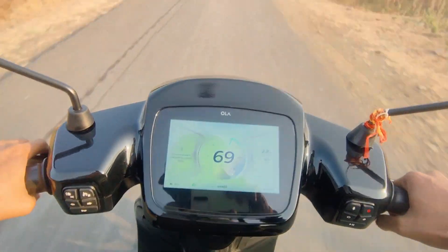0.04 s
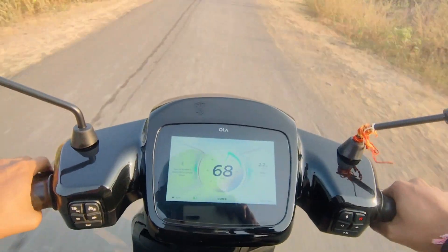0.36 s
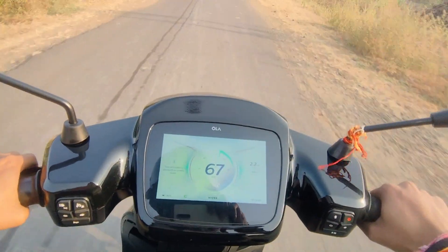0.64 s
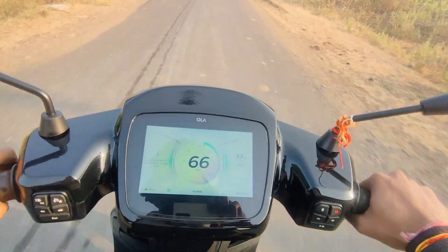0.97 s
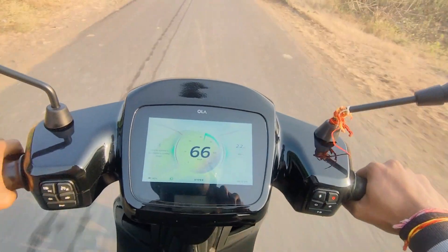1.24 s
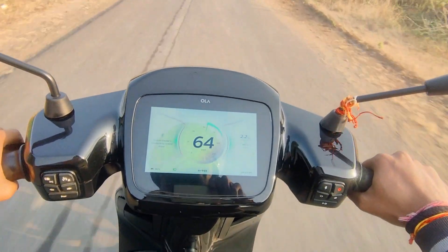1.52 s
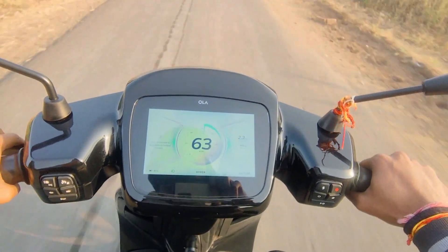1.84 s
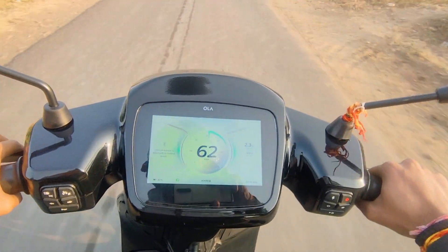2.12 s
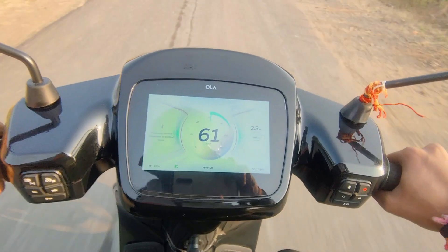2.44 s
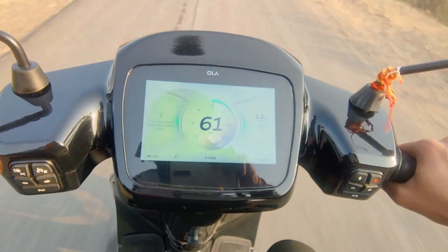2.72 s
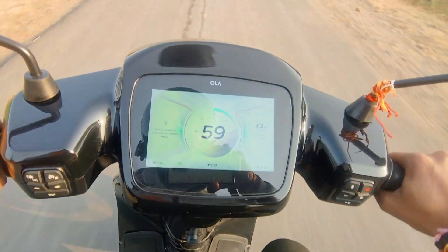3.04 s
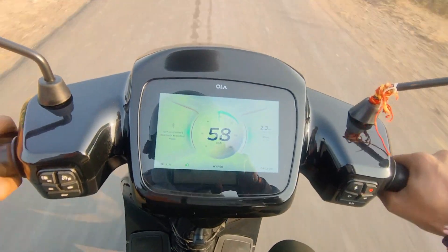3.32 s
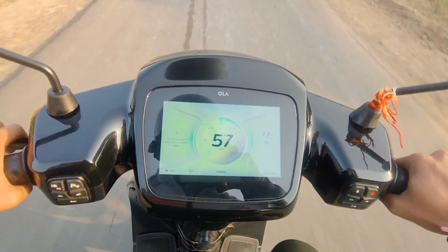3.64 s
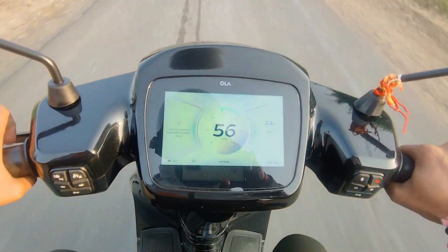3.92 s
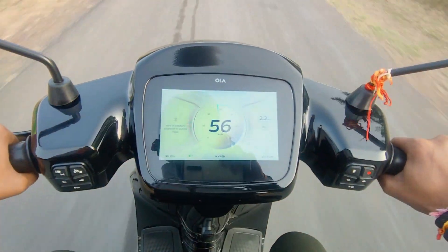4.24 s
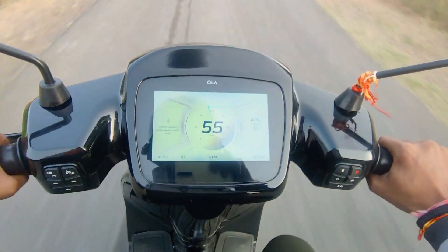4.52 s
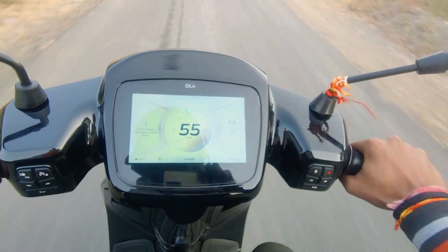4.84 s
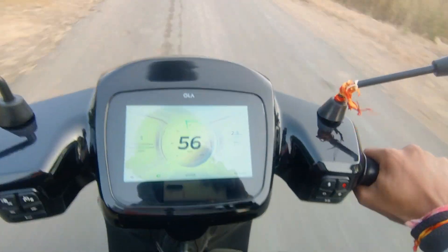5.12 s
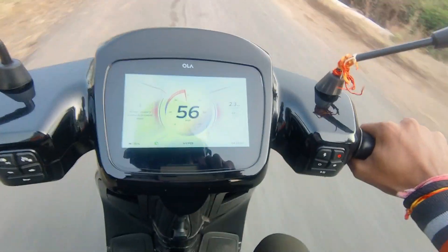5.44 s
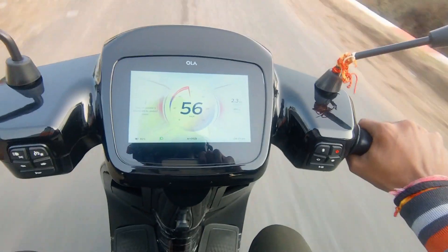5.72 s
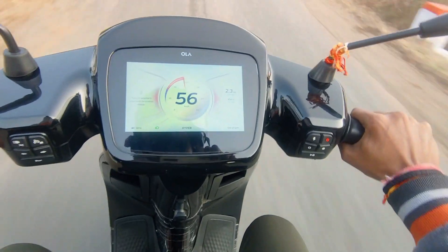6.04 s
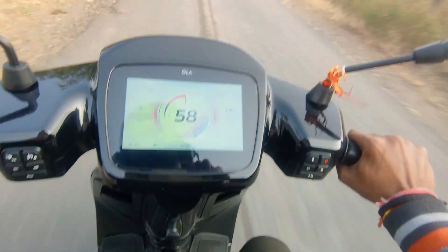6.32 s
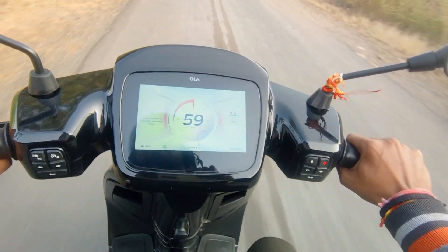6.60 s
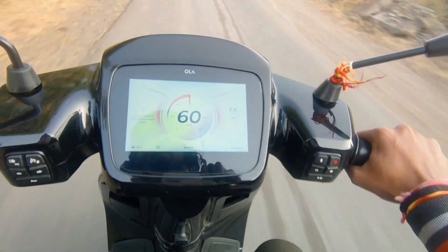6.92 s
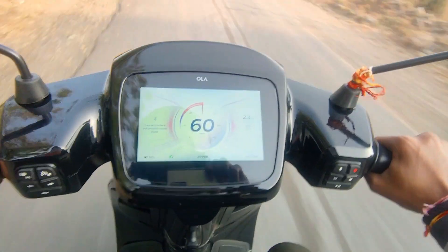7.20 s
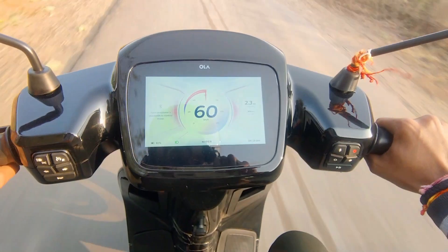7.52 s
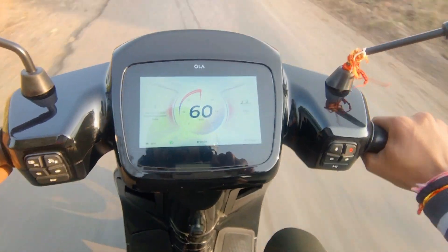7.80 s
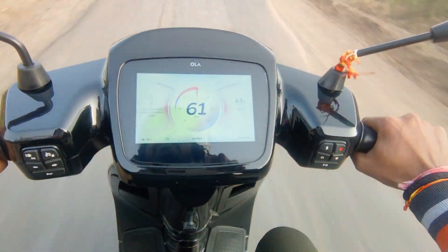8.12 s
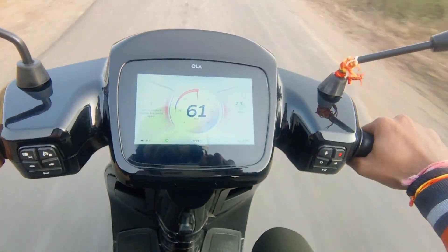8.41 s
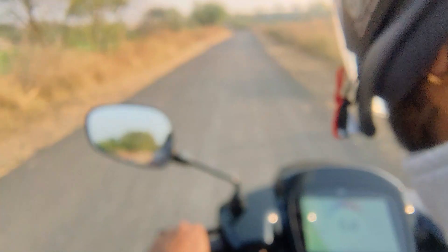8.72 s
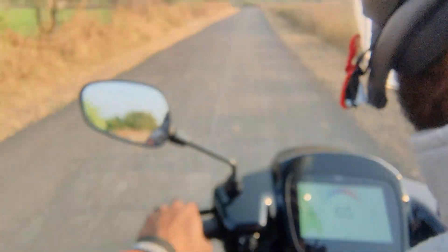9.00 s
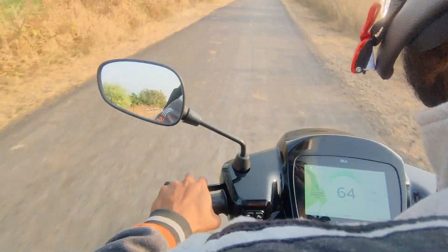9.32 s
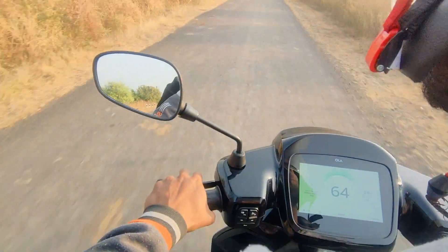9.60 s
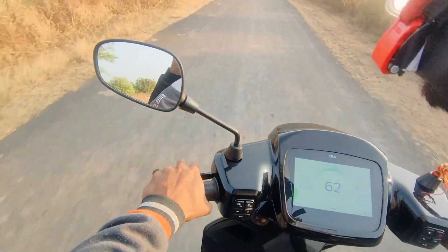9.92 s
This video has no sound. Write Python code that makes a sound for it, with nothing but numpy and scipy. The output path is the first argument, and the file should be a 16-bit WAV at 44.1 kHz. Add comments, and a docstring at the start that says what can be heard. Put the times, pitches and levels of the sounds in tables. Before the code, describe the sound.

Gusty wind rumbles over an electric scooter's tyres and motor, cuts out briefly, then returns with a loud, high, many-toned whine.

```python
"""Wind on a scooter ride

An electric scooter rides fast along a country road. Turbulent eddies buffet and spit at each of two
microphone ports independently, and the rumble grows as the airstream leans to the left. Beneath it
the tyres hiss, grit ticks and a motor-like whirr, the harmonics of a shaft, revs up and sinks twice.
After a click and half a second of silence the wind is back, with a loud, many-toned whine on the left."""
import sys
import numpy as np
from scipy import signal
from scipy.fft import rfft, irfft, next_fast_len
from scipy.io import wavfile
from scipy.ndimage import map_coordinates

SR = 44100
rng = np.random.default_rng(int(sys.argv[2]) if len(sys.argv) > 2 else 0)


def digitize_waveform(pressure):
    """Quantize a signal to 16-bit integers and store it at the path in sys.argv[1].

    Rows of a 2-D input are taken as channels; values are limited to [-1, 1].
    """
    field = np.atleast_2d(pressure).T
    bounded = np.clip(field, -1, 1)
    quanta = np.round(bounded * 32767).astype(np.int16)
    wavfile.write(sys.argv[1], SR, quanta)


N = 439236
TIME = np.arange(N) / SR
PAUSE_START_S, PAUSE_END_S = 8.728, 9.245

# Levels are relative, spectra are densities, balance is left minus right, half widths are at 1/e.
# spectrum of tyres on asphalt: f/Hz, level/dB
TYRE_SPECTRUM = [(200, 1.5), (600, 4), (1200, -16.5), (2400, -17), (3500, -27.5), (5600, -23), (7200, -35),
                 (9500, -35.5), (11000, -44), (15800, -45.5)]
# grit striking the scooter: t/s, level/dB
GRIT_IMPACTS = [(1.8815, -37), (3.551, -34), (3.785, -38), (4.413, -31), (4.4322, -37), (6.1359, -40),
                (6.1683, -30), (6.1975, -40), (6.387, -39), (6.449, -32), (6.459, -30), (6.4836, -38),
                (6.498, -32), (6.5145, -39), (6.523, -35), (6.5365, -41), (8.303, -39)]
# spectrum of a tick of grit: f/Hz, level/dB
TICK_SPECTRUM = [(2000, -30), (5000, 10), (9000, -1.5), (15000, -2.5)]
# faint swells of high sizzle: t/s, half width/s, level/dB
SIZZLE_SWELLS = [(0.42, .08, -54), (1.17, 0.089, -49.5), (1.42, 0.13, -53.5), (6.48, 0.095, -56)]
# rising hums: start/s, end/s, first f/Hz, last f/Hz, level/dB
HUM_GLIDES = [(4.1, 4.58, 425, 468, -32.5), (5.9, 6.42, 480, 595, -35.5)]
# rotation of the whirring shaft: t/s, f/Hz
SHAFT_SPEED = [(4.1, 43.2), (4.35, 45.05), (4.55, 46.4), (4.66, 48), (4.87, 52.8), (5.03, 55), (5.15, 52.3),
               (5.45, 50), (5.95, 53), (6.3, 57.8), (6.88, 61.8), (7.15, 61), (7.55, 54.3), (9.25, 55.3),
               (9.6, 53.7), (9.96, 52)]
# resonances of the housing that radiates the whirr: f/Hz, bandwidth/Hz, level/dB
HOUSING_MODES = [(470, 110, 11), (1120, 130, 2), (1410, 120, 3.5), (1720, 170, -1.5), (2110, 130, -2),
                 (2540, 130, -11)]
# surges of the whirr: start/s, peak/s, end/s, level/dB, phase jitter/rad, {harmonic: boost/dB}
WHIRR_SURGES = [(4.2, 4.58, 4.74, -27.3, .2, {23: 5, 24: 8, 25: 6, 29: 6, 32: 6, 39: 6, 46: 8, 55: 3}),
                (4.7, 4.98, 5.25, -27.4, .24, {23: 5, 26: 7, 29: 8, 32: 5, 38: 3, 39: 5}),
                (5.96, 6.52, 7.45, -31, .38, {23: 8, 24: 6, 27: 5, 29: 5, 32: 5}),
                (9.0, 9.6, 10.3, -34, .4, {24: 14, 25: 6})]
# low tones under the whine: f/Hz, level/dB
LOW_PARTIALS = [(632, -39.5), (838, -34.5), (1086, -42)]
# tones of the whine: f/Hz, level/dB
WHINE_PARTIALS = [(2178, -51), (2299, -33), (2536, -48.5), (2649, -29), (2778, -41.5), (2907, -46),
                  (3020, -31), (3138, -47.5), (3260, -47.5), (3383, -43.5), (3499, -24), (3537, -46),
                  (3620, -50), (3741, -40), (3984, -38.5), (4097, -46.5), (4344, -51), (4463, -37.5),
                  (5190, -42.5), (5312, -58), (8080, -63)]
# swells of its two leading tones: t/s, first level/dB, second level/dB
LEAD_SWELLS = [(9.26, -24.5, -39), (9.305, -38, -35), (9.36, -38, -30), (9.398, -25, -36.5),
               (9.554, -26, -26), (9.705, -21, -33.5), (9.768, -31, -44), (9.84, -29, -27),
               (9.95, -28, -32)]
# periodic swells of its tones: f/Hz, swell rate/Hz, crest t/s, depth/dB
WHINE_TREMOLO = [(2299, 3.3, 9.66, 4.5), (3020, 1.03, 9.86, 1.5), (3741, 0.61, 8.7, 12),
                 (4463, 3.7, 9.61, 4.5), (5190, 4.4, 9.77, 1)]
# direction of the whine: f/Hz, balance/dB
WHINE_BALANCE = [(800, 27), (2300, 7), (2650, 18), (3500, 9), (3900, 0), (5200, 3), (8000, -3)]
# spectra of the wind before and after the pause: f/Hz, level/dB
GUSTY_SPECTRUM = [(13, -53), (22, -13), (125, -3), (183, -3.5), (418, -3.5), (1260, -14.5), (1400, -16.5),
                  (1570, -18.5), (2120, -22.5), (2790, -26.5), (5550, -35.5), (7110, -43.5), (10500, -56.5),
                  (14500, -55.5), (15800, -61)]
STEADY_SPECTRUM = [(25, -24), (60, -14), (120, 1.5), (300, -4), (700, -11.5), (1300, -16.5), (1600, -22),
                   (2200, -25.5), (3300, -24), (4200, -29.5), (5600, -30), (7000, -43), (10000, -46.5),
                   (15800, -50)]
# lean of the airstream towards the left port: t/s, lean/dB
STREAM_LEAN = [(0.0, 1.5), (0.3, 6.5), (0.52, 2), (0.72, 10), (0.9, 2), (1.08, -2), (1.5, 3.5), (2.1, -0.5),
               (2.4, 3.5), (2.6, 4), (3.3, 0), (3.8, 4), (4.4, 5), (4.65, -0.5), (5.1, 0), (5.28, 7),
               (5.7, 6.5), (5.9, 2), (6.3, 6.5), (6.55, 9), (7.1, 8.5), (7.45, 8), (7.6, 7), (8.1, 3.5),
               (8.7, -0.5)]
# response of the low wind to lean: head-on level/dB, level slope/(dB/dB), balance slope/(dB/dB)
RUMBLE_BY_LEAN = (-33, 0.83, 1.9)
BUFFET_BY_LEAN = (-22, 0.23, 0.81)
# strength of the wind's roar and of its tearing treble: t/s, left level/dB, right level/dB
ROAR_LEVELS = [(0.0, -22, -24), (0.24, -22, -19.5), (0.34, -23.5, -25), (0.74, -26, -19.5), (0.9, -25, -27),
               (1.1, -29, -18), (1.34, -25.5, -21), (1.56, -21.5, -20.5), (1.74, -22, -27.5),
               (1.82, -20.5, -21.5), (2.3, -23.5, -19.5), (2.9, -24.5, -19), (3.7, -23.5, -20),
               (3.84, -27.5, -20.5), (4.42, -23, -24.5), (4.58, -26.5, -23.5), (5.14, -19, -22.5),
               (5.24, -30.5, -19), (5.45, -23.5, -19), (5.62, -24, -17), (6.08, -24, -23.5),
               (6.3, -20.5, -20.5), (6.8, -30, -19.5), (7.22, -27.5, -18), (7.46, -25, -19),
               (8.7, -25.5, -19)]
TEARING_LEVELS = [(0.0, -44.5, -42), (0.42, -34.5, -38), (0.94, -44.5, -43), (1.5, -41, -42.5),
                  (1.84, -47.5, -39.5), (2.12, -36, -40), (2.36, -51, -46), (2.68, -58, -38.5),
                  (2.88, -49, -52), (3.14, -49.5, -49), (3.3, -40, -50), (3.4, -50, -57),
                  (3.66, -46.5, -41.5), (3.8, -57.5, -49), (5.1, -42.5, -42.5), (5.28, -54.5, -47),
                  (6.48, -43, -43.5), (6.84, -52, -46), (6.9, -46.5, -40), (8.1, -48, -41.5),
                  (8.2, -41.5, -42.5), (8.7, -46, -49)]
# steady wind, a row each for buffet, roar and tearing: level/dB, balance/dB
STEADY_BANDS = [(-20, -4.5), (-22, -3), (-33.5, -6)]
# passing gusts (+) and lulls (-): t/s, half width/s, left level/dB, right level/dB
PASSING_GUSTS = [(0.07, 0.032, -0.5, -2), (0.15, 0.027, -9.5, 1), (0.23, 0.042, 2.5, 5),
                 (0.84, 0.033, 7, 3), (1.0, 0.019, 6, 8), (1.5, 0.025, 6.5, -1), (1.9, 0.15, 1, 3.5),
                 (2.1, 0.049, 3, 3), (3.37, .06, -4, 3.5), (4.68, 0.033, 4.5, 0), (4.74, 0.024, -2, -12),
                 (5.05, 0.091, 1, -1.5), (6.92, 0.027, -4, 5), (7.33, 0.09, 1.5, 1), (7.83, 0.053, 0, 4)]
# gusts that boom on the left port: t/s, half width/s, level/dB
BOOM_GUSTS = [(0.13, 0.042, -25), (0.36, 0.046, -22.5), (1.22, 0.07, -22.5), (1.43, 0.11, -23.5),
              (3.2, 0.33, -22)]
# dull knocks of wind on a port: t/s, level/dB, balance/dB
THUD_IMPACTS = [(0.066, -13.5, -3), (0.277, -20, -4.5), (2.289, -16, -1), (3.472, -17, -13),
                (5.69, -22, -6.5), (6.497, -18, -6), (7.439, -17, -8), (7.673, -16, -5),
                (8.334, -16.5, -14)]
# sharp transients, spits of wind except the last, a click just before the sound cuts to silence:
# t/s, level/dB, balance/dB, half width/ms
SHARP_TRANSIENTS = [(0.038, -20, 11, 3.5), (0.068, -24, -3, 4), (0.094, -22, 15, 2.7),
                    (0.175, -24, -8, 1.5), (0.259, -26, 9, 2), (0.367, -21, 18, 2), (0.394, -21, 13, 2),
                    (0.437, -24, 8, 3), (0.476, -23.5, 8, 3), (0.562, -22, 5, 1.5), (1.569, -25.5, 5, 2.5),
                    (1.668, -24, 4, 2), (1.684, -25, 20, 3), (1.712, -27, 10, 1.5), (2.262, -23, 14, 4),
                    (2.313, -32, 6, 1.4), (2.417, -24.5, 6, 2.7), (2.502, -22.5, 4, 2.2),
                    (2.809, -23.5, 3, 3), (2.884, -21, 9, 2.8), (2.985, -23, 8, 2), (3.304, -25, 7, 1.5),
                    (3.33, -21, 18, 3.7), (4.66, -20.5, -11, 3), (7.856, -26, -5.5, 3),
                    (7.941, -23, 4.5, 2.2), (7.985, -24, -9.5, 2.4), (8.031, -23, 0, 2),
                    (8.117, -21, 0, 2.4), (8.163, -21, 2, 4.5), (8.305, -20, 5, .8), (8.358, -23, -9, 2),
                    (8.447, -22, -3, 1.5), (8.493, -22, 13.5, 1.7), (8.525, -18, 9, 1.5),
                    (8.637, -23.5, -12, 3.2), (8.72, -18, -1, 1.1)]
# spectra of a knock, a spit or click, and the fine crackle: f/Hz, level/dB
THUD_SPECTRUM = [(100, -18.5), (350, 2), (800, 0.5), (1500, -8.5), (3000, -28), (8000, -52)]
TRANSIENT_SPECTRUM = [(150, -18.5), (500, 4), (1200, 8.5), (2500, -2), (5600, -12), (7200, -27),
                      (11000, -35.5), (15800, -43)]
CRACKLE_SPECTRUM = [(400, -13), (1500, 2), (3200, -2), (5800, -6.5), (7400, -21), (11000, -31),
                    (15800, -36)]


def amp(db):
    """Amplitude ratio of a level in decibels."""
    return 10 ** (np.asarray(db) / 20)


def unit(x):
    """Normalisation to rms 1."""
    return x / np.sqrt(np.mean(x ** 2) + 1e-20)


def along(points, hz):
    """Interpolation of (f/Hz, value) points on a logarithmic frequency axis."""
    f, values = np.transpose(points)
    return np.interp(np.log(hz + 1), np.log(f + 1), values)


def curves(rows):
    """Linear interpolation in time: one signal for each column after t/s."""
    times, *columns = np.transpose(rows)
    return np.array([np.interp(TIME, times, column) for column in columns])


def bell(t, half_width):
    """Gaussian envelope centred on t = 0."""
    return np.exp(-(t / half_width) ** 2)


def wobble(rate, time=TIME):
    """Smooth random modulation through `rate` Gaussian values a second."""
    knots = rng.standard_normal(4096)
    coarse = time[::16]
    return np.interp(time, coarse, map_coordinates(knots, [coarse * rate], mode="wrap"))


def filtered(x, response):
    """Linear filtering: the spectrum is multiplied by a frequency response."""
    size = next_fast_len(N + 8192)
    return irfft(rfft(x, size) * response(np.fft.rfftfreq(size, 1 / SR)), size)[..., :N]


def panned(balance_db):
    """Left and right gains of constant total power."""
    gains = amp(np.array([[.5], [-.5]]) * balance_db)
    return gains / np.sqrt(np.mean(gains ** 2, axis=0))


def at_ports(level_db, balance_db):
    """Division of a level between the left and right ports, in dB."""
    return level_db + 20 * np.log10(panned(balance_db))


def hiss(response):
    """Filtered noise of rms 1, incoherent between the ports."""
    return unit(filtered(rng.standard_normal((2, N)), response))


def narrow_hiss(centre_hz, width_hz):
    """Noise confined to a Lorentzian band."""
    return hiss(lambda hz: 1 / (1 + ((hz - centre_hz) / width_hz) ** 2))


def bursts(rows, spectrum):
    """Noise under Gaussian envelopes; rows give t/s, level/dB, balance/dB, half width/ms."""
    noise, out = hiss(lambda hz: amp(along(spectrum, hz))), np.zeros((2, N))
    for s, db, pan, width_ms in rows:
        near = slice(max(round(s * SR) - SR // 80, 0), round(s * SR) + SR // 80)
        envelope = bell(TIME[near] - s, width_ms / 1000)
        burst = noise[:, near] * envelope
        burst *= np.linalg.norm(envelope) / np.linalg.norm(burst, axis=1, keepdims=True)
        out[:, near] += amp(db) * panned(pan) * burst
    return out


def drive_whistle(level_db, centre_hz, width_hz):
    """Switching in the motor drive gives narrow-band noise, heard as a faint, fuzzy whistle."""
    return amp(level_db + 2 * wobble(2)) * narrow_hiss(centre_hz, width_hz)


def tyres(level_db):
    """Rolling contact of rubber on asphalt radiates an even broadband hiss."""
    return amp(level_db + 0.43 * wobble(4.2)) * hiss(lambda hz: amp(along(TYRE_SPECTRUM, hz)))


def grit(level_db, t60_s):
    """Impacts of grit decay exponentially as bright ticks; a faint sizzle shares their spectrum."""
    ticks, age = np.zeros((2, N)), TIME[:SR // 40]
    for s, db in GRIT_IMPACTS:
        decay = amp(db + level_db - 60 * age / t60_s)
        ticks[:, round(s * SR):][:, :len(age)] += decay * rng.standard_normal((2, len(age)))
    colour = lambda hz: amp(along(TICK_SPECTRUM, hz))
    sizzle = sum(amp(db) * bell(TIME - s, width) for s, width, db in SIZZLE_SWELLS)
    return filtered(ticks, colour) + sizzle * hiss(colour)


def hums():
    """Linear frequency sweeps: a low drone rises each time the whirr revs up."""
    out = np.zeros(N)
    for start, end, from_hz, to_hz, db in HUM_GLIDES:
        progress = np.clip((TIME - start) / (end - start), 0, 1)
        cycles = np.cumsum(from_hz + (to_hz - from_hz) * progress) / SR
        out += amp(db) * np.sqrt(2 * np.abs(np.sin(np.pi * progress))) * np.sin(2 * np.pi * cycles)
    return out


def whirr(arch_power, scatter_db, waver_db, pan_db):
    """Forced vibration: harmonics of a shaft's rotation glide through the resonances of a housing."""
    shaft_hz, = curves(SHAFT_SPEED)
    turns = np.cumsum(shaft_hz) / SR
    out = np.zeros((2, N))
    for start, peak, end, peak_db, jitter_rad, boosts in WHIRR_SURGES:
        on = (TIME > start) & (TIME < end)
        t = TIME[on]
        arch = np.abs(np.sin(np.interp(t, (start, peak, end), [0, np.pi / 2, np.pi]))) ** arch_power
        tones = np.zeros((2, len(t)))
        for order in range(8, 58):
            hz = order * shaft_hz[on]
            housing_power = sum(amp(db) ** 2 / (1 + (2 * (hz - centre) / width) ** 2)
                                for centre, width, db in HOUSING_MODES)
            level = boosts.get(order, 0) + scatter_db * rng.standard_normal((2, 1))
            level = level + waver_db * wobble(12, t)
            port_phase = 2 * np.pi * rng.random() + np.pi / 5 * rng.standard_normal((2, 1))
            phase = 2 * np.pi * order * turns[on] + port_phase + jitter_rad * wobble(40, t)
            tones += np.sqrt(housing_power) * amp(level) * np.sin(phase)
        out[:, on] += amp(peak_db) * arch * unit(tones)
    return panned(pan_db) * out


def undertones(flutter_db, jitter_rad, pan_db):
    """Random amplitude and phase modulation: the whine's low tones come and go in the wind."""
    tones = sum(amp(db + flutter_db * wobble(16))
                * np.sin(2 * np.pi * hz * TIME + jitter_rad * wobble(30)) for hz, db in LOW_PARTIALS)
    return np.sqrt(2) * panned(pan_db) * tones


def rasp(level_db, centre_hz, width_hz, pan_db):
    """Common modulation: a band of hiss swells with the whine's leading tone."""
    lead, _ = curves(LEAD_SWELLS)
    return amp(lead + level_db) * panned(pan_db) * narrow_hiss(centre_hz, width_hz)


def whine(level_db, lead_db, waver_db, flutter_db, drift_cycles, jitter_rad, wander_rad):
    """Shrill partials, like those of a horn's diaphragm, are modulated by the airstream."""
    swells = curves(LEAD_SWELLS)
    clock = TIME + drift_cycles * wobble(15) / 3500  # shared drift, in cycles of 3500 Hz
    on = TIME > PAUSE_END_S
    t, out = TIME[on], np.zeros((2, N))
    for rank, (hz, db) in enumerate(sorted(WHINE_PARTIALS, key=lambda tone: -tone[1])):
        if rank < len(swells):
            level = swells[rank][on] + lead_db
        else:
            tremolo = sum(depth * np.cos(2 * np.pi * rate * (t - crest))
                          for tone_hz, rate, crest, depth in WHINE_TREMOLO if abs(tone_hz - hz) < 20)
            level = db + level_db + tremolo + waver_db * wobble(18, t)
        phase = 2 * np.pi * hz * clock[on] + jitter_rad * wobble(110, t)
        # the far port lags by about a quarter cycle
        lag = np.array([wander_rad * wobble(14, t), np.pi / 2 + wander_rad * wobble(14, t)])
        gain = amp(level + flutter_db * wobble(80, t)) * panned(along(WHINE_BALANCE, hz))
        out[:, on] += gain * np.sqrt(2) * np.sin(phase - lag)
    return out


def eddies(scales, limit=2.2):
    """Turbulence at each port: superposed (rate/Hz, weight) fluctuations whose extremes saturate."""
    swirl = np.array([sum(weight * wobble(rate) for rate, weight in scales) for port in range(2)])
    return unit(np.tanh(unit(swirl) / limit))


def below(hz, edge_hz):
    """Fourth-order low-pass magnitude response."""
    return 1 / np.sqrt(1 + (hz / edge_hz) ** 8)


def above(hz, edge_hz):
    """The high-pass response of complementary power."""
    return np.sqrt(1 - below(hz, edge_hz) ** 2)


def leaning(law):
    """Angle of incidence: the further left the stream leans, the louder and further left a layer is."""
    lean, = curves(STREAM_LEAN)
    level_db, growth, shift = law
    return at_ports(level_db + growth * lean, shift * lean)


def rumble(level_db, spectrum, low_hz, high_hz, lump_db):
    """The largest eddies give the slowest pressure fluctuations, which thump on the ports."""
    noise = hiss(lambda hz: amp(along(spectrum, hz)) * hz / np.hypot(hz, low_hz) * below(hz, high_hz))
    return amp(level_db) * unit(noise * amp(lump_db * eddies([(12, 1)])))


def booms(centre_hz, sharpness, pan_db):
    """Large gusts modulate a narrow band of low noise, each swelling and fading."""
    envelope = sum(amp(db) * bell(TIME - s, width) for s, width, db in BOOM_GUSTS)
    band = lambda hz: 1 / (1 + (sharpness * (hz / centre_hz - centre_hz / (hz + 1))) ** 2)
    return envelope * panned(pan_db) * hiss(band)


def thuds(level_db, width_ms):
    """The pressure pulse of a larger vortex hitting a port is a dull knock."""
    return bursts([(s, db + level_db, pan, width_ms) for s, db, pan in THUD_IMPACTS], THUD_SPECTRUM)


def crackle(level_db, spread_db, cluster_db, scatter_s, width_s, count, cluster_size):
    """Tiny vortices snap where the wind tears at a port; more snaps surround each sharp transient."""
    tearing = curves(TEARING_LEVELS)
    snaps = np.zeros((2, N))
    for side, when, strength in rng.random((count, 3)):
        place = int(2 * side), int(when * N)
        snaps[place] = amp(tearing[place] + level_db + spread_db * strength ** 2)
    for s, db, pan, _ in SHARP_TRANSIENTS:
        for delay, strength in rng.standard_normal((cluster_size, 2)):
            at = abs(round((s + scatter_s * delay) * SR))
            snaps[:, at] += amp(db + cluster_db + 2 * strength) * panned(pan)[:, 0]
    pulse = bell(np.arange(-200, 201) / SR, width_s)
    envelope = signal.fftconvolve(snaps, pulse[None], "same", axes=1)
    return envelope * hiss(lambda hz: amp(along(CRACKLE_SPECTRUM, hz)))


def spits_and_click(sharp_db, small_db, spread_db, width_s, count):
    """Small vortices burst on a port as pressure pulses; a sharp click precedes the silence."""
    wind_db = (curves(ROAR_LEVELS) + curves(TEARING_LEVELS)) / 2
    small = np.zeros((2, N))  # lesser, duller spits, which scale with the wind
    for side, when, size in rng.random((count, 3)):
        small[int(2 * side), int(when * N)] = amp(small_db + spread_db * size ** 2)
    pulse = bell(np.arange(-400, 401) / SR, width_s)
    envelope = signal.fftconvolve(small * amp(wind_db), pulse[None], "same", axes=1)
    sharp = amp(sharp_db) * bursts(SHARP_TRANSIENTS, TRANSIENT_SPECTRUM)
    dull_noise = hiss(lambda hz: amp(along(TRANSIENT_SPECTRUM, hz)) / np.hypot(1, hz / 5000))
    return sharp + envelope * dull_noise


def wind(spectrum, swirl, buffet_db, roar_db, tear_db, upper_mid_db, depth_db):
    """Turbulent modulation: an eddy lifts the low buffet a little, the roar more, the treble most."""
    def layer(band, level_db, share):
        noise = hiss(lambda hz: amp(along(spectrum, hz)) * band(hz))
        return amp(level_db) * unit(noise * amp(share * depth_db * swirl))

    between_db = (roar_db + tear_db) / 2 + upper_mid_db
    return (layer(lambda hz: above(hz, 100) * below(hz, 265), buffet_db, share=0.089)
            + layer(lambda hz: above(hz, 232) * below(hz, 947), roar_db, share=0.46)
            + layer(lambda hz: above(hz, 944) * below(hz, 2470), between_db, share=0.81)
            + layer(lambda hz: above(hz, 2510), tear_db, share=0.82))


def steady_wind(rumble_db, rise_db_per_s):
    """Shallow modulation gives smoother wind, here bright and to the right, over a growing rumble."""
    swirl = eddies([(14, 0.4), (45, 0.45), (150, 0.5)])
    buffet, roar, tear = [at_ports(db, pan) for db, pan in STEADY_BANDS]
    rising_db = rumble_db + rise_db_per_s * (TIME - PAUSE_END_S)
    return (wind(STEADY_SPECTRUM, swirl, buffet, roar, tear, upper_mid_db=-1.8, depth_db=2.5)
            + rumble(rising_db, STEADY_SPECTRUM, low_hz=20, high_hz=76, lump_db=3.0))


def gusty_wind(tear_db, gust_db, body_share, upper_mid_share):
    """Unsteady flow makes ragged wind; gusts pass each port and lift the upper middle most."""
    swirl = eddies([(36, 0.26), (90, 0.54), (240, 0.72)])
    passing = sum(np.array([[left], [right]]) * bell(TIME - s, width)
                  for s, width, left, right in PASSING_GUSTS)
    gusts = gust_db * eddies([(11, 1)]) + body_share * passing
    buffet = leaning(BUFFET_BY_LEAN) + gusts / 2
    roar = curves(ROAR_LEVELS) + gusts
    tear = curves(TEARING_LEVELS) + tear_db + gusts
    upper_mid = 1.7 + upper_mid_share * passing
    return (wind(GUSTY_SPECTRUM, swirl, buffet, roar, tear, upper_mid, depth_db=4.5)
            + rumble(leaning(RUMBLE_BY_LEAN), GUSTY_SPECTRUM, low_hz=15, high_hz=119, lump_db=1.5))


def scene():
    """Superposition of the sources in two stretches of the ride, with silence between them."""
    ride = gusty_wind(tear_db=-3.0, gust_db=0.3, body_share=0.62, upper_mid_share=0.52)
    ride += spits_and_click(sharp_db=-.5, small_db=-1, spread_db=8, width_s=.0015, count=300)
    ride += thuds(level_db=-.5, width_ms=2.5)
    ride += crackle(level_db=2, spread_db=11.5, cluster_db=-11, scatter_s=.01, width_s=.0006,
                    count=750, cluster_size=2)
    ride += booms(centre_hz=91.2, sharpness=1.3, pan_db=10.0)
    ride += tyres(level_db=-36.5)
    ride += grit(level_db=2.0, t60_s=0.0079)
    ride += drive_whistle(level_db=-75.5, centre_hz=14340, width_hz=60)
    motor = hums() + whirr(arch_power=.75, scatter_db=1, waver_db=1.8, pan_db=-2.5)
    late = steady_wind(rumble_db=-29, rise_db_per_s=9.5)
    late += whine(level_db=2.3, lead_db=5.2, waver_db=1.6, flutter_db=.9,
                  drift_cycles=.07, jitter_rad=.14, wander_rad=.28)
    late += undertones(flutter_db=3.5, jitter_rad=.6, pan_db=14)
    late += rasp(level_db=-17, centre_hz=3450, width_hz=300, pan_db=10)
    fade_out = np.clip((PAUSE_START_S - TIME) / 0.0092, 0, 1)
    fade_in = np.clip((TIME - PAUSE_END_S) / .0015, 0, 1)
    return (ride + motor) * fade_out + (late + motor) * fade_in


def record(dry):
    """Band limiting: a steep low-pass removes everything above 15850 Hz."""
    return filtered(dry, lambda hz: 1 / (1 + (hz / 15850) ** 200))


dry = scene()
out = record(dry)
digitize_waveform(out)
```